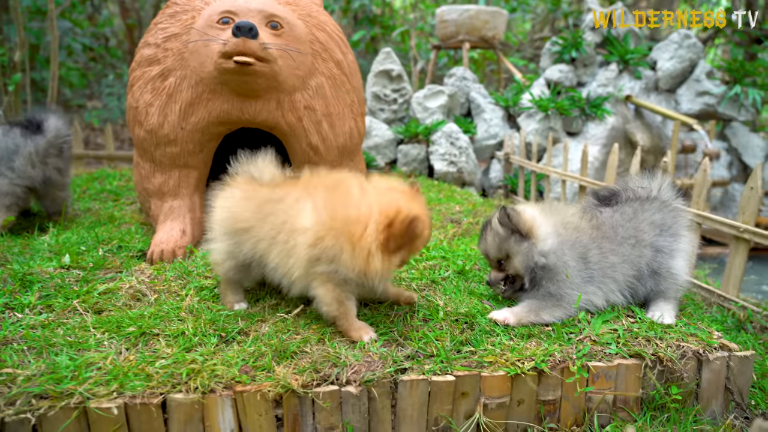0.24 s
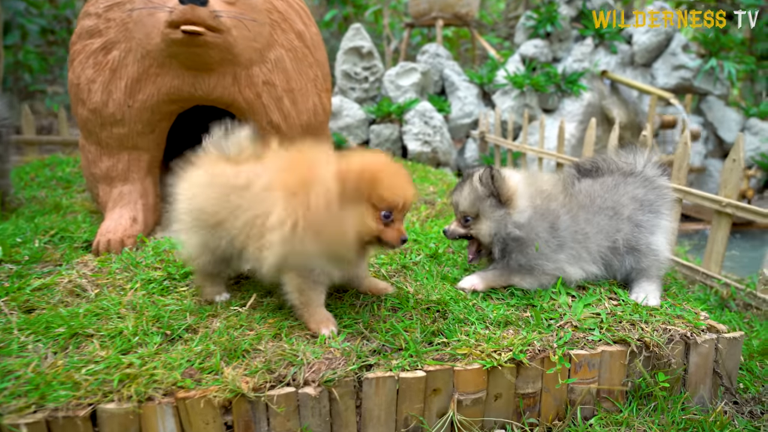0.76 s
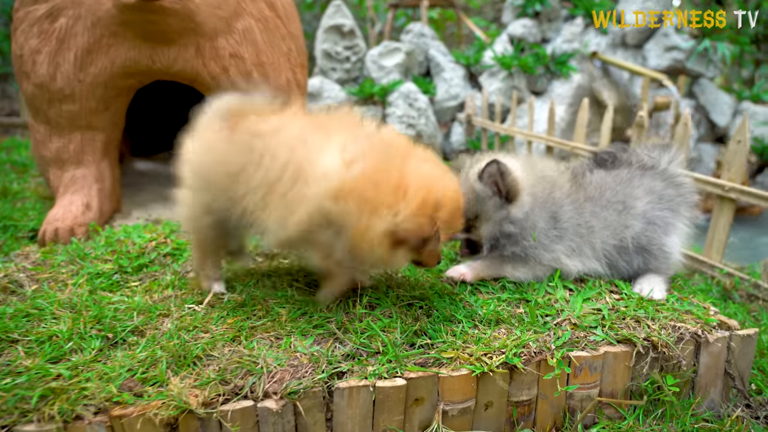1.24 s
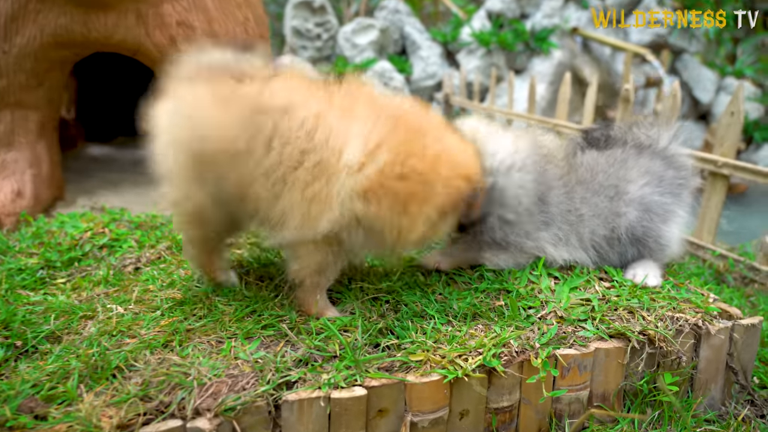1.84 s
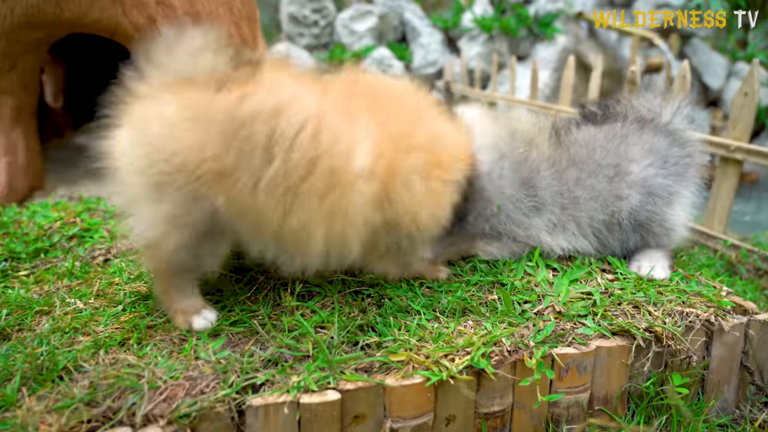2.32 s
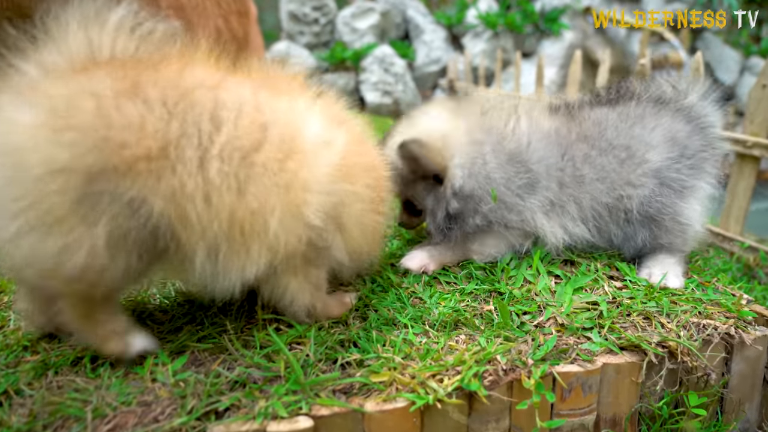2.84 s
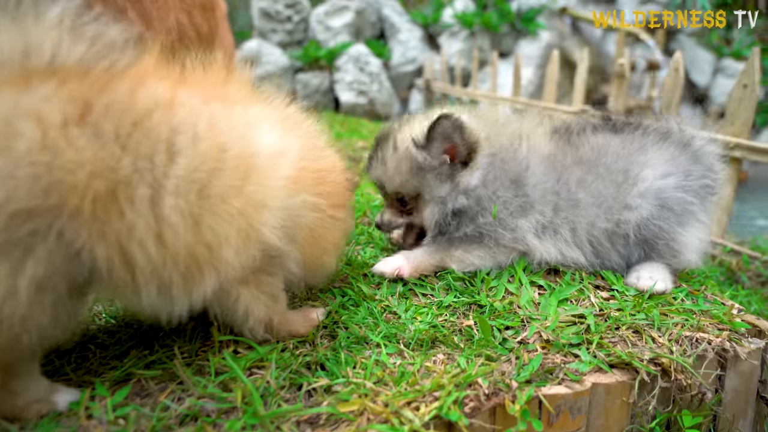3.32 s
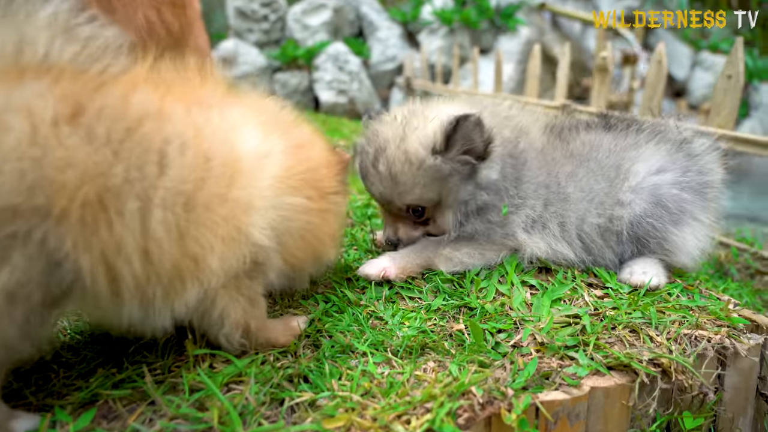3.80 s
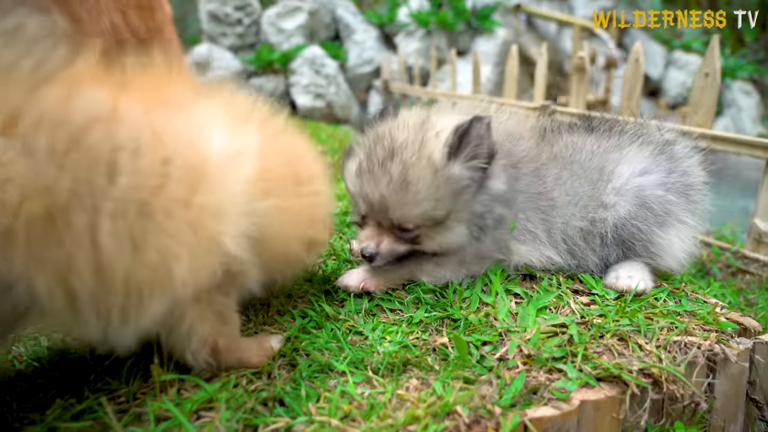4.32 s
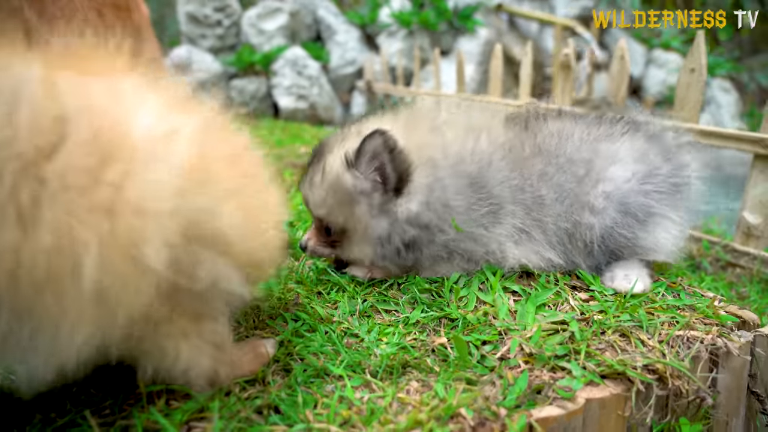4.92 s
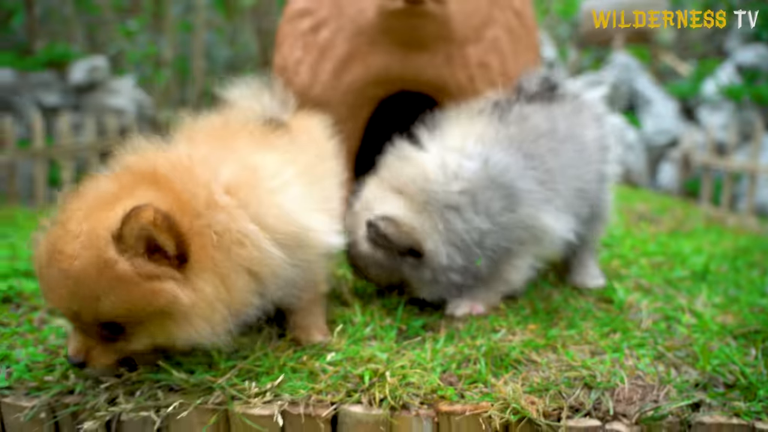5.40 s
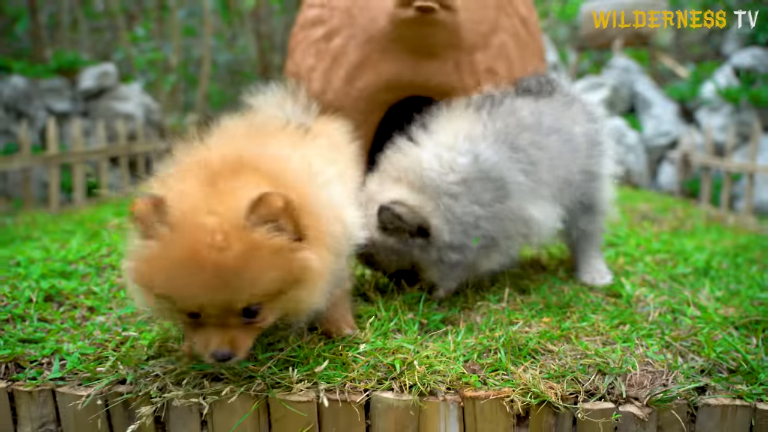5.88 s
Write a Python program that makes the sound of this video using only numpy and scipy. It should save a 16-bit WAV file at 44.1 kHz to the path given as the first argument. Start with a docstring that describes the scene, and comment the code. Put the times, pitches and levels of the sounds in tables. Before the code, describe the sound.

Water trickles throughout about six seconds in a garden stone basin, close and slightly right of centre in wide stereo. Irregular drops tick, ring and plop brightly over a soft, unsteady wash, tiny ringing bubbles and crisp fizz. Larger bubbles gurgle upward in pitch, notably around 1.2, 1.7, 2.2, 2.9 and 4.5 seconds. A songbird beyond the water gives a brief slurred note near 1 second, then quick falling chirps with a diffuse echo at about 1.25, 2.05, 2.9 and 4.5. Drops crowd closer together from 3 to 4.2 seconds, and a strong one lands near 5.05. From 5.4 to the end the bird is clearer and drier, running through gliding, rising and falling whistles. Faint dull double pats recur roughly every 0.8 seconds, almost buried under the water.

```python
"""Water trickles in a garden: splashing drops tick, ring, plop and spray; big bubbles gurgle upward
in pitch; a noise wash, small ringing bubbles and fizz run beneath, in a stone basin.
A songbird of gliding sines, with echo, repeats a falling chirp and adds drier slurred notes, one
early and most late. Faint, mostly evenly paced double pats of dull noise sound under the water."""
import sys
import numpy as np
from scipy import signal
from scipy.fft import rfft, irfft, next_fast_len
from scipy.io import wavfile
from scipy.ndimage import uniform_filter1d, map_coordinates

SR = 44100
rng = np.random.default_rng(int(sys.argv[2]) if len(sys.argv) > 2 else 0)


def store_wav(level_fs):
    """Save 16-bit WAV to argv[1]."""
    pcm = np.round(np.clip(np.atleast_2d(level_fs), -1, 1) * 32767)
    wavfile.write(sys.argv[1], SR, pcm.T.astype(np.int16))


N = 271215

# spectrum of a plop or pop: hz, density_db_per_hz
PLOP_SPECTRUM = [(250, -11), (600, 0), (1100, 13.5), (1800, -2.5), (4000, -6)]


def amp(db):
    """Decibels to gain."""
    return 10 ** (np.asarray(db) / 20)


def unit(x):
    """Scaled to rms 1."""
    return x / np.sqrt(np.mean(x ** 2) + 1e-20)


def along(points, hz):
    """Interpolate (hz, value) points on a log frequency axis."""
    f, v = np.transpose(points)
    return np.interp(np.log(hz + 1), np.log(f + 1), v)


def wobble(rate_hz, size):
    """Smooth random curve with rate_hz knots a second."""
    knots = rng.standard_normal(int(size * rate_hz / SR) + 4)
    return map_coordinates(knots, [np.arange(size) * rate_hz / SR])


def filtered(x, response):
    """Multiply the spectrum of x by a response of frequency."""
    size = x.shape[-1]
    m = next_fast_len(size + 4096)
    return irfft(rfft(x, m) * response(np.fft.rfftfreq(m, 1 / SR)), m)[..., :size]


def coloured(x, spectrum):
    """x shaped by a spectrum, at rms 1."""
    return unit(filtered(x, lambda hz: amp(along(spectrum, hz))))


def rippled(spectrum, ripple_db):
    """Spectrum with random humps: no two splashes have the same colour."""
    hz = np.geomspace(500, 20000, num=40)
    humps = unit(uniform_filter1d(rng.standard_normal(len(hz)), size=2))
    return np.column_stack([hz, along(spectrum, hz) + ripple_db * humps])


def panned(left_over_right_db):
    """Left and right gains for a level difference."""
    return amp([[left_over_right_db / 2], [-left_over_right_db / 2]])


def add(out, start_s, x):
    """Mix x into out from start_s."""
    start = max(round(start_s * SR), 0)
    part = out[:, start:start + x.shape[-1]]
    part += x[..., :part.shape[1]]


def half_angle(alike):
    """Mixing angle that gives two noises a left-right likeness."""
    return np.arccos(np.clip(alike, -1, 1)) / 2


def echo(x, t60s, alike):
    """Fresh stereo noise tail for x; each frequency dies at its own speed."""
    hz, t, z = signal.stft(rng.standard_normal((2, SR // 2)), SR, nperseg=256)
    decay = amp(-60 * t / along(t60s, hz)[:, None])
    a, b = signal.istft(z * decay, SR, nperseg=256)[1]
    turn = half_angle(alike)
    mid, side = np.cos(turn) * a, np.sin(turn) * b
    tail = np.array([mid + side, mid - side])
    return signal.fftconvolve(np.atleast_2d(x), tail / np.linalg.norm(tail[0]), axes=1)


def thin(x):
    """High-pass: drops and bubbles are too small to radiate bass."""
    return signal.sosfilt(signal.butter(3, 350, "high", fs=SR, output="sos"), x)


def pats():
    """Faint, dull double pats: two noise bumps, the second weaker."""
    # start_s, level_db
    pat_times = [(0.379, -38), (1.18, -40), (1.979, -38), (2.774, -34.5), (3.577, -37.5), (4.383, -37),
                 (5.197, -38.5), (5.596, -34)]
    # hz, density_db_per_hz
    pat_spectrum = [(60, -29), (120, -21), (190, 2), (300, -3.5), (600, -7.5), (2000, -14)]
    attack_s, width_s = 0.003, 0.0096
    out, t = np.zeros((2, N)), np.arange(SR // 8) / SR
    touch = lambda delay_s: np.exp(-((t - delay_s) / width_s) ** 2)
    shape = (1 - np.exp(-t / attack_s)) * (touch(0.0025) + 0.43 * touch(0.039))
    for start_s, level_db in pat_times:
        noise = coloured(rng.standard_normal(len(t)), pat_spectrum)
        add(out, start_s, amp(level_db) * shape * noise)
    return out


def sing(hz, db, direct_db, near_db, echo_db, alike, waver, flutter_db):
    """Bird note: a gliding, unsteady sine with a faint octave, near scatter and garden echo."""
    # scatter off nearby rocks and leaves: hz, t60_s
    near_t60 = [(1000, 0.069), (5000, 0.16)]
    # garden echo: hz, t60_s
    garden_t60 = [(300, 0.39), (2000, 0.48), (4500, 0.76), (12000, 0.08)]
    size = len(hz)
    pitch_hz = hz * (1 + waver * wobble(506.7, size))
    phase = 2 * np.pi * np.cumsum(pitch_hz) / SR
    level = amp(db + flutter_db * wobble(310.0, size)) * signal.windows.tukey(size, .12)
    note = level * (np.sin(phase) + amp(-32) * np.sin(2 * phase))
    out = amp(near_db) * echo(note, near_t60, alike)
    out = out + amp(echo_db) * echo(note, garden_t60, alike)
    add(out, 0, amp(direct_db) * note)
    return out


def bird():
    """Mostly echoed falling chirps of one shape; drier gliding notes on arcs of pitch."""
    # falling chirps: start_s, level_db, left_over_right_db
    chirp_calls = [(1.25, -25, -1), (2.057, -28, 0), (2.934, -26, -3), (4.474, -26, -2)]
    # one chirp: time_s from its start, pitch_hz, level_db relative to the call
    chirp_shape = [(0, 5180, 2.5), (.013, 4350, 0.5), (.029, 3502, 2.5), (.046, 2950, -2),
                   (0.065, 2370, -3)]
    # gliding notes, one early, most late, one a lower falling chirp:
    # start_s, length_s, first_hz, middle_hz, last_hz, level_db, crest (share of length)
    gliding_notes = [(0.966, 0.0366, 2200, 2380, 1920, -26.4, 0.24),
                     (5.383, 0.081, 2110, 1950, 1100, -20, 0.55),
                     (5.537, .073, 4400, 3423, 2615, -21.5, 0.82),
                     (5.667, 0.2, 1420, 2516, 2813, -19.5, 0.33),
                     (5.874, 0.037, 2110, 1727, 1500, -28, 0.28),
                     (5.934, .044, 1234, 1793, 1990, -20.5, 0.62),
                     (6.073, .076, 2097, 2644, 2680, -19.5, 0.2)]
    edge_db = -14.5  # a note swells from this, relative to its crest, and fades back to it
    out = np.zeros((2, N))
    knots_s, knots_hz, knots_db = np.transpose(chirp_shape)
    t = np.arange(0, knots_s[-1], 1 / SR)
    chirp_hz, chirp_db = np.interp(t, knots_s, knots_hz), np.interp(t, knots_s, knots_db)
    for start_s, level_db, pan_db in chirp_calls:
        chirp = sing(chirp_hz, chirp_db + level_db, direct_db=-8.0, near_db=-0.5, echo_db=-2.6,
                     alike=0.28, waver=0.0444, flutter_db=-1.4)
        add(out, start_s, panned(pan_db) * chirp)
    for start_s, length_s, first_hz, middle_hz, last_hz, level_db, crest in gliding_notes:
        age = np.linspace(0, 1, int(length_s * SR))
        parabola = np.polyfit([0, .5, 1], [first_hz, middle_hz, last_hz], 2)
        arc_hz = np.polyval(parabola, age)
        swell_db = level_db + edge_db * np.interp(age, [0, crest, 1], [1, 0, 1])
        glide = sing(arc_hz, swell_db, direct_db=-1.5, near_db=-5, echo_db=-2.5,
                     alike=0.57, waver=0.032, flutter_db=2.5)
        add(out, start_s, panned(-1.3) * glide)
    return out


def droplets(rate_hz, centre_hz, spread, cycles, size_spread_db):
    """Countless small decaying rings of random time, pitch, size and place, at rms 1."""
    draws = rng.random((int(rate_hz * N / SR), 4))
    start, place = draws[:, :1], draws[:, 1:2]
    size = amp(-size_spread_db * np.log(0.0232 + draws[:, 2:3]))
    pitch_hz = centre_hz * np.exp(spread * rng.standard_normal(size.shape))
    pitch_hz = np.clip(pitch_hz, 300, 15000)
    t = np.arange(SR // 80) / SR
    envelope = size * np.exp(-t * pitch_hz / cycles) * (1 - t / t[-1])
    index = ((start * N).astype(int) + np.arange(len(t))).ravel()
    lag_s = (draws[:, 3:] - .5) * 0.00038  # between the ears

    def ear(gain, shift_s):
        rings = gain * envelope * np.sin(2 * np.pi * pitch_hz * (t + shift_s))
        return np.bincount(index, rings.ravel(), N)[:N]

    return unit(np.array([ear(np.sqrt(place), 0), ear(np.sqrt(1 - place), lag_s)]))


def spatter(rate_hz, decay_s, size_spread_db):
    """Little noise splashes: instant start, exponential decay, own colours, at rms 1."""
    # hz, density_db_per_hz
    fizz_spectrum = [(2500, -42.5), (4500, 3.5), (5800, 1), (8200, -3.5), (10000, -0.5), (13000, -5.5),
                     (15200, 1), (16500, -38)]
    out, t = np.zeros((2, N)), np.arange(SR // 20) / SR
    for when, size in rng.random((int(rate_hz * N / SR), 2)):
        hiss = coloured(rng.standard_normal((2, len(t))), rippled(fizz_spectrum, ripple_db=2))
        add(out, when * N / SR, amp(size_spread_db * size ** 2) * np.exp(-t / decay_s) * hiss)
    return unit(out)


def trickle():
    """Running water: a soft noise wash, small bubbles, and fizz in little splashes."""
    # time_s, babble_db, fizz_db, both before the layer gains
    flow_levels = [(0.0, -48.5, -41.5), (0.43, -50, -46), (1.2, -49.5, -43), (1.88, -51, -48),
                   (2.55, -50, -43), (2.93, -50.5, -46), (5.39, -50.5, -45.5), (5.52, -48, -46.5),
                   (5.91, -48.5, -41), (6.15, -50, -43)]
    # hz, density_db_per_hz
    babble_spectrum = [(18, -58), (30, -31), (100, -11.5), (165, -10.5), (227, -8), (616, 0.5),
                       (1130, -2.5), (1320, 1), (1810, -2.5), (2980, 0), (5450, -1), (8520, -10),
                       (9710, -5), (14800, -16), (16000, -31)]
    # hz, left-right likeness
    wash_likeness = [(100, 1), (300, 0.76), (1000, 0.39), (2500, 0.21), (5000, 0.37), (14000, 0.19)]
    babble_gain_db, fizz_gain_db = 9, 3
    time_s, babble_db, fizz_db = np.transpose(flow_levels)
    t = np.arange(N) / SR
    babble = amp(np.interp(t, time_s, babble_db + babble_gain_db))
    fizz = amp(np.interp(t, time_s, fizz_db + fizz_gain_db))

    def mid_side(hz):
        turn = half_angle(along(wash_likeness, hz))
        return np.array([np.cos(turn), np.sin(turn)])

    mid, side = filtered(rng.standard_normal((2, N)), mid_side)
    unsteady = amp(0.03 + 0.68 * wobble(14, N))
    wash = unsteady * coloured(np.array([mid + side, mid - side]), babble_spectrum)
    small = amp(-5.5) * droplets(rate_hz=420, centre_hz=2926, spread=0.3898, cycles=39,
                                 size_spread_db=3.0)
    tiny = amp(-4.5) * droplets(rate_hz=900, centre_hz=7464, spread=0.318, cycles=48,
                                size_spread_db=2.5)
    splashes = amp(-4.0) * spatter(rate_hz=55, decay_s=.008, size_spread_db=10)
    return panned(-1.0) * (babble * wash + thin(babble * small + fizz * (tiny + splashes)))


def bubble(pitch_hz, level, birth_db):
    """One bubble: a soft noise pop as it is pinched off, and its sine ring."""
    t = np.arange(len(pitch_hz)) / SR
    phase = 2 * np.pi * np.cumsum(pitch_hz) / SR
    ring = level * amp(wobble(272, len(t))) * np.sin(phase)
    noise = coloured(rng.standard_normal(len(t)), PLOP_SPECTRUM)
    pop = amp(birth_db - 8.5) * np.exp(-t / 0.0066) * noise
    return (ring + pop) * signal.windows.tukey(len(t), .04)


def bubbles():
    """Big bubbles shoot up in pitch and quiver near the surface; others ring at one pitch."""
    # rise and burst: start_s, life_s, first_hz, last_hz, birth_db, surface_db (relative levels)
    rising = [(.034, 0.064, 790, 1704, -28.5, -38), (0.654, 0.0233, 917, 1610, -38, -39),
              (1.038, .036, 833, 1130, -32, -33), (1.177, 0.059, 715, 1444, -23, -43.5),
              (1.735, 0.063, 461, 2000, -23.5, -28.5), (1.744, 0.015, 1415, 1930, -55, -38),
              (2.155, .059, 470, 1190, -26, -28.5), (2.935, .105, 407, 1188, -29.5, -34),
              (4.549, 0.072, 368, 1020, -22, -26.5)]
    # ring and die away: start_s, pitch_hz, level_db (relative)
    plinks = [(0.2209, 1660, -37), (2.837, 980, -36), (3.325, 782, -34.5), (3.438, 658, -34),
              (4.517, 1330, -30), (4.941, 683, -38), (5.058, 628, -22.5), (5.177, 876, -29.5),
              (5.196, 3130, -35), (5.352, 1460, -32.5), (6.024, 520, -30.5), (6.069, 1057, -29.5)]
    # basin colour on the gurgles: hz, gain_db
    bowl_response = [(350, -9), (480, -4.5), (620, 3.5), (790, -10), (1100, -2), (1600, 3), (2300, -3)]
    rising_decay_s, plink_decay_s = 0.016, 0.013
    shoot_power, quiver = 4.68, 0.0512  # lateness of the pitch rise; unsteadiness at the surface
    burst_age, burst_width = 0.9, 0.22  # final swell, as shares of life
    out = np.zeros((2, N))
    for start_s, life_s, first_hz, last_hz, birth_db, surface_db in rising:
        t = np.arange(int(1.2 * life_s * SR)) / SR
        age = t / life_s
        pitch_hz = first_hz * (last_hz / first_hz) ** (np.minimum(age, 1.03) ** shoot_power)
        pitch_hz = pitch_hz * (1 + quiver * age * wobble(601, len(t)))
        birth = amp(birth_db) * np.exp(-t / rising_decay_s)
        burst = amp(surface_db) * np.exp(-((age - burst_age) / burst_width) ** 2)
        add(out, start_s, bubble(pitch_hz, birth + burst, birth_db))
    out = filtered(out, lambda hz: amp(along(bowl_response, hz)))
    t = np.arange(SR // 16) / SR
    for start_s, pitch_hz, level_db in plinks:
        level = amp(level_db) * np.exp(-t / plink_decay_s)
        add(out, start_s, bubble(np.full(len(t), pitch_hz), level, level_db))
    return amp(1) * panned(-5.5) * out


def splash(level_db, hz, spray_db, plop_db):
    """A drop ticks, leaves tiny bubbles ringing near one pitch, plops and throws fine spray."""
    # hz, density_db_per_hz
    spray_spectrum = [(500, -27), (1200, -8), (2500, 1.5), (5500, -0.5), (8000, -2), (10500, 6.5),
                      (13000, -3.5), (15500, -14), (17000, -43)]
    attack_s = 0.00051
    tick_s, ring_s, spray_s, plop_s = 0.0017, 0.0036, 0.0053, 0.0043  # decays
    tilt_db = 0.056 * spray_db  # less spray: more ring, less tick
    t = np.arange(SR // 16) / SR

    def noise(apart):
        return rng.standard_normal(len(t)) + apart * rng.standard_normal((2, len(t)))

    def band(octaves):
        wide, narrow = 2 ** octaves, 2 ** (octaves / 3)
        return [(hz / wide, -24), (hz / narrow, -3), (hz * narrow, -3), (hz * wide, -24)]

    def burst(db, decay_s, apart, spectrum):
        return amp(db) * np.exp(-t / decay_s) * coloured(noise(apart), spectrum)

    ring = amp(-5 - tilt_db) * np.exp(-t / ring_s) * np.sin(2 * np.pi * hz * t * (1 + 8 * t))
    cluster = burst(-7.5, 3 * tick_s, 0.38, band(octaves=0.69))
    tick = burst(-1.5 + tilt_db, tick_s, 0.47, band(octaves=1.8))
    spray = burst(spray_db, spray_s, 1.0, rippled(spray_spectrum, ripple_db=1.5))
    plop = burst(plop_db, plop_s, 1.0, PLOP_SPECTRUM)
    # lower drops fall further right: 1 dB per octave about 3500 Hz
    place = panned(-5 + 1 * np.log2(hz / 3500))
    onset = 1 - np.exp(-t / attack_s)
    return amp(level_db) * place * onset * (ring + cluster + tick + spray + plop)


def drops():
    """Loud drops at set times, and faint ones of random level and pitch at a jittered pace."""
    # start_s, level_db, pitch_hz, spray_db, plop_db (last two relative to level_db)
    loud_drops = [(0.0332, -27.5, 3040, -15, -2), (0.106, -18, 2280, -29, -24),
                  (0.2203, -13.5, 2210, -46, -36), (.238, -23.5, 3000, -29, -27),
                  (.384, -22, 3050, -27, -35), (0.489, -21, 4620, -49, -37.5),
                  (.549, -23.5, 4590, -34, -28), (0.7466, -21, 5580, -13, -20),
                  (.830, -23, 6150, -0.5, -30), (1.04, -21.5, 2520, -3.5, -18),
                  (1.3491, -13, 4430, -27, -40), (1.554, -18, 5300, -9, -35),
                  (1.6373, -15.5, 2798, -16, -16), (1.6843, -24, 2640, -23, -10),
                  (1.9828, -25.5, 2300, -16, -24), (2.071, -20.5, 4040, -33, -33.5),
                  (2.3552, -19, 5240, -8, -37), (2.5373, -18.5, 6050, -14, -29),
                  (2.902, -22, 2540, -31, -22), (2.9992, -15, 3680, -17, -31), (3.148, -23.5, 5200, 0, -13),
                  (3.1677, -23, 2110, -12, -31), (3.2845, -22.5, 2450, -22, -30),
                  (3.321, -26.5, 2490, 0.5, -9), (3.384, -16.5, 2820, -32, -47),
                  (3.4371, -21.5, 2350, -31.5, -24), (3.582, -21.5, 2880, -10, -8),
                  (3.633, -24, 3700, -4, -7.5), (3.697, -20, 2600, -5.5, -36),
                  (3.747, -16, 2690, -21, -14.5), (3.851, -24.5, 3740, -3, -24),
                  (3.9644, -21, 5480, -5, -22), (3.989, -19.5, 3714, -36, -35),
                  (4.0356, -21.5, 4930, -6.5, -28), (4.0903, -18, 6320, -7.5, -37.5),
                  (4.1367, -13.5, 2140, -17, -8.5), (4.3909, -26.5, 3120, -29, -27),
                  (4.6987, -23.5, 7600, -3, -25.5), (4.7574, -21.5, 5320, 0, -37),
                  (4.7818, -17.5, 3590, -39, -42), (4.8422, -23.5, 2170, -0.5, -2),
                  (4.8855, -24, 4370, -6, -21), (4.9396, -21, 3820, -23, -24),
                  (5.006, -25, 3160, -23, -34.5), (5.059, -12, 5260, -16.5, -29),
                  (5.311, -16.5, 4060, -12, -42), (5.3396, -19, 1880, -18, -36),
                  (5.469, -15, 2730, -5.5, -18), (5.9881, -15.5, 2360, -34.5, -32),
                  (6.024, -23.5, 1070, -9, -9), (6.088, -17, 2260, -28, -36), (6.1326, -16, 2220, -21, -18)]
    gap_s, faint_db, spread_db = 0.11, -30, 3
    centre_hz, spread_octaves = 2580, 0.429
    out = np.zeros((2, N))
    for start_s, level_db, pitch_hz, spray_db, plop_db in loud_drops:
        add(out, start_s, splash(level_db, pitch_hz, spray_db, plop_db))
    for start_s in np.arange(0, N / SR, gap_s):
        late, size, pitch = rng.standard_normal(3)
        pitch_hz = centre_hz * 2 ** (spread_octaves * pitch)
        faint = splash(faint_db + spread_db * size, pitch_hz, spray_db=-22, plop_db=-24)
        add(out, start_s + late * gap_s / 2, faint)
    return out


def scene():
    """Water in its stone basin, a little to the right, with the bird beyond and faint pats."""
    # hz, t60_s
    basin_t60 = [(300, 0.072), (2500, 0.17), (12000, 0.23)]
    splashes, gurgles = thin(drops()), thin(bubbles())
    basin = echo(amp(-2.5) * splashes + amp(-8) * gurgles, basin_t60, alike=0.033)[:, :N]
    water = splashes + gurgles + basin + trickle()
    lag_s = 5e-5  # the left ear hears the water later
    ears = np.array([[-1j], [1j]])
    water = filtered(water, lambda hz: np.exp(ears * np.pi * hz * lag_s))
    return water + bird() + pats()


def record(dry):
    """The recorder keeps nothing above its band limit."""
    top_hz = 16100
    return filtered(dry, lambda hz: hz < top_hz)


dry = scene()
out = record(dry)
store_wav(out)
```